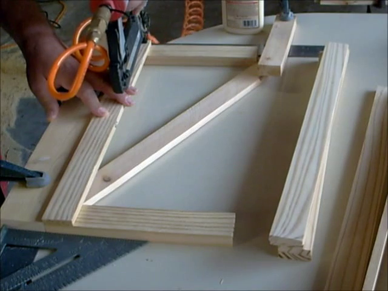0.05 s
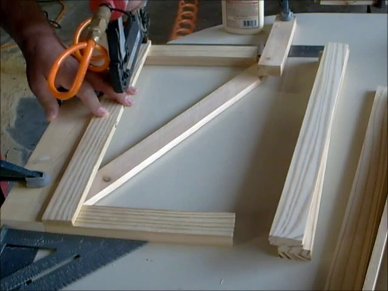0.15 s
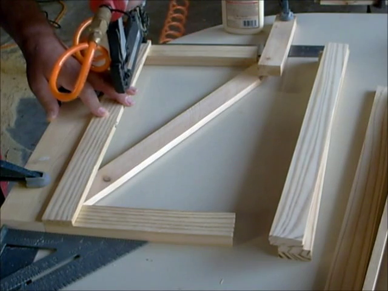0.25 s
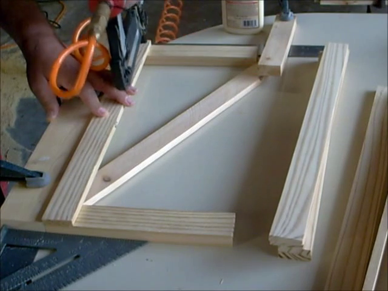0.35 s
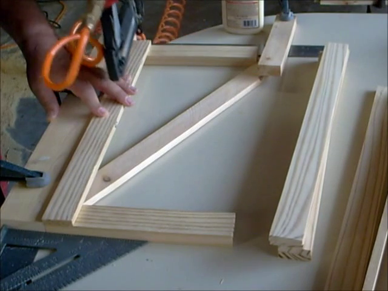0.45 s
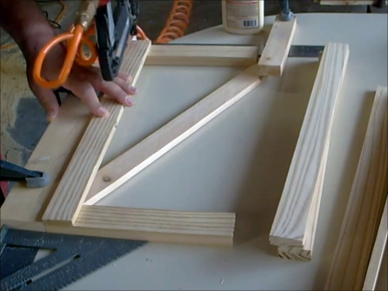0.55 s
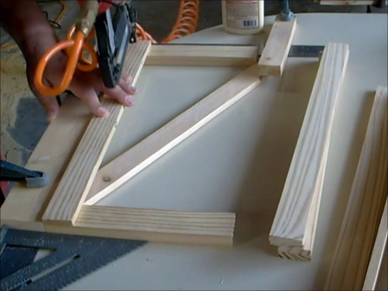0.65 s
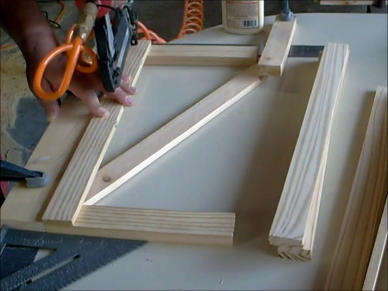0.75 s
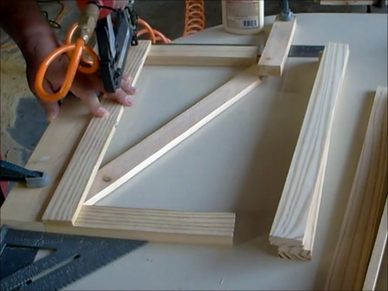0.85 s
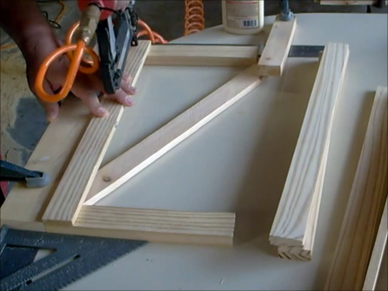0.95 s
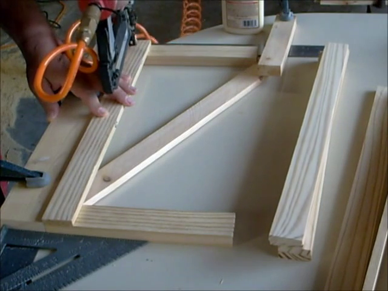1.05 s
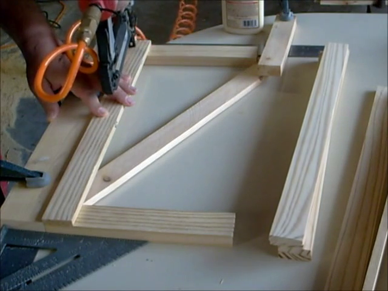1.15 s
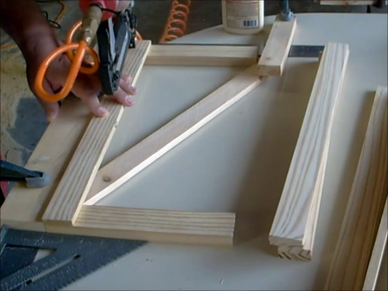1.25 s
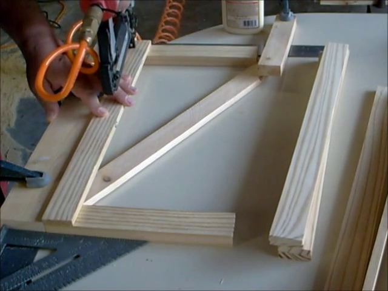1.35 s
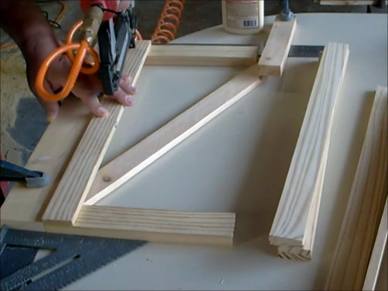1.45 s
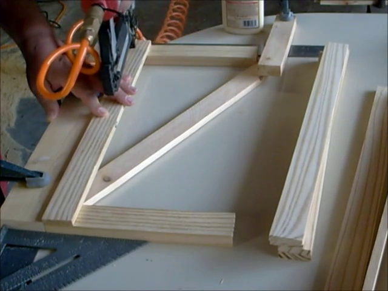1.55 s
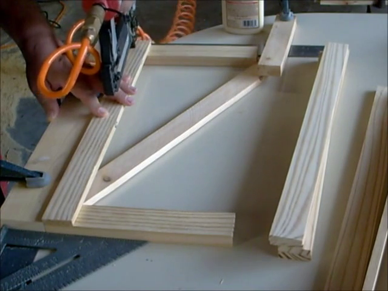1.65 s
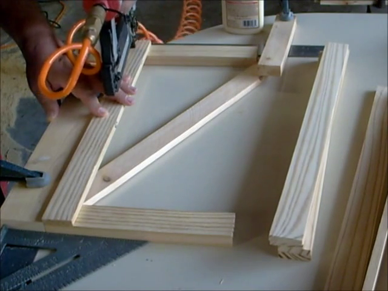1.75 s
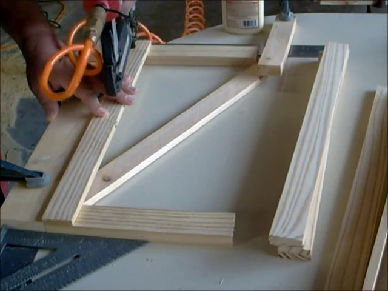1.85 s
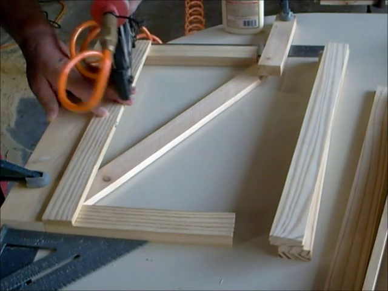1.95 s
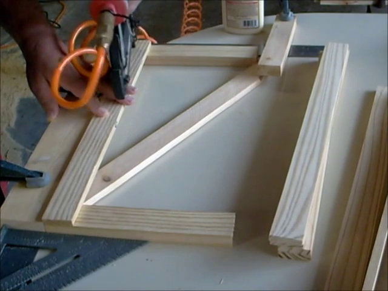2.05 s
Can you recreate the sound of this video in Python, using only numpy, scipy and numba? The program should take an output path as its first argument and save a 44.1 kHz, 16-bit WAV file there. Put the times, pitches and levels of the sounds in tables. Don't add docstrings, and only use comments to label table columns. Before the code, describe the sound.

A pneumatic nailer fires a single shot, close and harsh. Faint distant machine hum opens; around 0.21 seconds the trigger ticks and air hisses. At 0.24 the driver cracks into wood, and a piercing, distorted exhaust blast holds until about 0.36, with bright air at the piston's return. The room tail dies by about one second. Faint nose knocks follow near 1.2 and 1.4, and a dull tap at 2.05 over low hum.

```python
import sys
import numpy as np
from scipy import signal
from scipy.fft import rfft, irfft, next_fast_len
from scipy.io import wavfile
from scipy.ndimage import uniform_filter1d
from numba import njit

SR = 44100
rng = np.random.default_rng(int(sys.argv[2]) if len(sys.argv) > 2 else 0)


def voltage_ratio(level):
    return 10 ** (np.asarray(level, float) / 20)


def generate_wav(sig):
    pcm = np.round(np.clip(np.atleast_2d(sig).T, -1, 1) * 32767).astype(np.int16)
    wavfile.write(sys.argv[1], SR, pcm)


N = 92610

# frequency in Hz, level in dB.
HUM_COLOUR = [(30, -11), (250, -9.5), (450, -11), (800, -4), (1700, -10), (3500, -23.5), (4100, -28),
              (10600, -35.5)]
# time in seconds, level in dB.
HUM_SWELL = [(0, -59), (.2, -52), (1.0, -54.5), (1.5, -53.5), (2.1, -49.5)]
# start in seconds, level in dB, ring in seconds, pitch in Hz.
CONTACTS = [
    (.2090, -41.5, .004, 3000),
    (.2178, -42.5, .003, 3500),
    (.2226, -15, 0.0028, 3100),
    (.2295, -27.5, .002, 3100),
    (.2365, -29, .002, 3100),
    (1.2205, -57, .01, 2980),
    (1.234, -56, 0.028, 2500),
    (1.399, -54, .01, 1190),
    (2.05, -45, 0.011, 1000),
]
# frequency in Hz, level in dB.
VALVE_COLOUR = [(60, -22), (500, -20), (1000, -5), (1800, -16.5), (3000, -2.5), (5500, -2.5), (7500, -11.5),
                (10200, -8.5)]
# frequency in Hz, level in dB.
BLAST_COLOUR = [(60, -38), (300, -13.5), (1100, 2), (2300, -2), (3200, -0.5), (4900, -12), (7000, -24.5),
                (10600, -37)]
# frequency in Hz, time to fall 60 dB in seconds.
ROOM_T60 = [(100, .35), (300, 0.51), (1200, 0.59), (3100, 0.57), (4500, 0.6), (7000, 0.52), (10000, 0.42)]
# first trough in seconds, length in seconds,
# height in dB over full scale.
SURGES = [(.2447, .0016, 1.6), (.2475, .0003, .9), (.2484, .0011, -.4), (.2586, 0, -.3), (.2881, 0, .6),
          (.2983, .0006, -.8), (.3157, .0003, 1.0), (.3227, 0, 1.2), (.3343, .0003, 1.4), (.3586, 0, .8),
          (.3715, .0019, 1.7), (.3848, 0, .55), (.3918, .0003, .7), (.3996, .0003, .9), (.4014, 0, .55),
          (.4020, 0, .5), (.4193, 0, .5), (.4212, .0045, -2.5), (.4365, .0006, -1.2), (.4464, 0, .5),
          (.4565, .002, -2.5), (.4612, .003, -2.5), (.4940, 0, -.7)]

BLOW_S, BLAST_S, RETURN_S = .2432, .2555, .371
MIC_HZ = 3117


@njit
def follow(x, up, down):
    level, levels = 0., np.empty(len(x))
    for i in range(len(x)):
        level += (abs(x[i]) - level) * (up if abs(x[i]) > level else down)
        levels[i] = level
    return levels


def read_curve(rows, hz):
    rows = np.array(rows)
    return np.interp(np.log(np.maximum(hz, 1)), np.log(rows[:, 0]), rows[:, 1])


def unit(x):
    return x / np.sqrt(np.mean(x ** 2))


def coloured(rows):
    f = np.arange(N // 2 + 1) * SR / N
    spec = rfft(rng.standard_normal(N)) * voltage_ratio(read_curve(rows, f))
    return spec / np.sqrt(np.mean(irfft(spec, N) ** 2)), f


def band_share(f, hz, per_octave):
    return np.clip(1 - np.abs(per_octave * np.log2(np.maximum(f, 1) / hz)), 0, 1)


def walk(rate):
    k = max(int(SR / rate), 1)
    return unit(uniform_filter1d(uniform_filter1d(rng.standard_normal(N), k), k))


def ring(x, hz, width_hz):
    return signal.lfilter(*signal.iirpeak(hz, hz / width_hz, SR), x)


def fade(t, start, rise, t60):
    u = np.maximum(t - start, 0)
    return (1 - np.exp(-u / rise)) * voltage_ratio(-60 * u / t60)


def hum(t):
    spec, f = coloured(HUM_COLOUR)
    machines = 0
    for hz in 30 * 2 ** np.arange(0, 10.):
        machines = machines + irfft(spec * band_share(f, hz, 1), N) * voltage_ratio(walk(10))
    swell_db = np.interp(t, *np.array(HUM_SWELL).T)
    drone = ring(ring(machines, 780, 560), 783, 552)
    drone = drone * voltage_ratio(swell_db) * np.clip(t - 1, 0, 1) * 0.38
    return machines * voltage_ratio(-55.5 + 0.54 * (swell_db + 53.5)) + drone


def contacts(t):
    noise = rng.standard_normal(N)
    out = 0
    for start, db, ring_s, hz in CONTACTS:
        tap = unit(ring(ring(noise, hz, .8 * hz), hz, .9 * hz))
        out = out + voltage_ratio(db) * fade(t, start, .0008, 3 * ring_s) * tap
    return out


def piston_return(t):
    rise_s, t60, hz, level_db = .02, .03, 8500, -16.5
    u = t - RETURN_S
    swell = np.exp(np.minimum(u, 0) / rise_s) * (t > BLAST_S)
    shape = np.where(u < 0, swell, voltage_ratio(-60 * np.maximum(u, 0) / t60))
    air = unit(ring(ring(rng.standard_normal(N), hz, 5000), hz, 6000))
    return voltage_ratio(level_db) * shape * air


def valve(t):
    start_s, rise_s, sag_db_per_s, level_db = .2192, 0.002987, 450, -20
    shape = fade(t, start_s, rise_s, 60 / sag_db_per_s) * np.clip((BLAST_S - t) / .004, 0, 1)
    hiss = irfft(coloured(VALVE_COLOUR)[0], N)
    sputter_db = 1.2 * walk(500)
    return hiss * shape * voltage_ratio(level_db + sputter_db)


def blow(t):
    push_s, push_db, thud_hz, thud_db, thud_t60 = .0007, -3, 1050, -2, .02
    crack_db, crack_hold_s, crack_t60 = 6.5, .005, 0.0084
    u = (t - BLOW_S) / push_s
    push = -np.sin(np.pi * u) * (u > 0) * (u < 2) * voltage_ratio(push_db)
    push = push * np.where(u > 1, 3.0, 1)
    late = t - BLOW_S - 1.4 * push_s
    thud = voltage_ratio(thud_db) * np.sin(2 * np.pi * thud_hz * late) * fade(late, 0, .0003, thud_t60)
    shape = np.clip(late / 0.00035, 0, 1) * voltage_ratio(-60 * np.maximum(late - crack_hold_s, 0) / crack_t60)
    crack = shape * voltage_ratio(crack_db) * unit(ring(rng.standard_normal(N), MIC_HZ, 1200))
    return push + thud + crack


def blast(t):
    rise_s, hold_s, level_db, flutter_db, flutter_per_s = .003, .1, 6, 1, 120
    spec, f = coloured(BLAST_COLOUR)
    u = t - BLAST_S
    rise = 1 - np.exp(-np.maximum(u, 0) / rise_s)
    out = 0
    for hz in 60 * 2 ** np.arange(0, 8, .5):
        t60 = read_curve(ROOM_T60, hz)
        lift = voltage_ratio(60 * .29 * (1 / t60 - 1 / read_curve(ROOM_T60, MIC_HZ)))
        decay = voltage_ratio(-60 * np.maximum(u, hold_s) / t60)
        out = out + irfft(spec * band_share(f, hz, 2), N) * lift * rise * decay
    return out * voltage_ratio(level_db + flutter_db * walk(flutter_per_s))


def scene():
    t = np.arange(N) / SR
    return (contacts(t) + valve(t) + blow(t) + blast(t) + hum(t) + piston_return(t))[None]


def low_pass(x):
    return signal.sosfilt(signal.butter(12, 15800, fs=SR, output="sos"), x)


def record(dry):
    limit_db, attack_s, release_s, ratio = -10, 0.0025, 0.017, 5
    surge_edge_s, wrap_jump, top_hz, settle_s, out_db = .0008, 1.6, 10750, .12, 0.2
    t = np.arange(N) / SR
    peak = ring(dry[0], MIC_HZ, 690)
    x = dry[0] + voltage_ratio(10) * peak + voltage_ratio(9) * ring(peak, 1.015 * MIC_HZ, 220)
    level = follow(x, 1 / (attack_s * SR), 1 / (release_s * SR))
    x = x * np.minimum(voltage_ratio(limit_db) / (level + 1e-9), 1) ** (1 - 1 / ratio)
    peak = ring(x, MIC_HZ, 600)
    swing = peak / (np.abs(signal.hilbert(peak, next_fast_len(N))[:N]) + 1e-9)
    troughs = t[signal.argrelmin(swing)[0]]
    wrap = np.zeros(N)
    for first_s, length_s, db in SURGES:
        start = troughs[np.argmin(np.abs(troughs - first_s))] - 1.2e-4
        end = start + length_s + 2.6e-4
        weight = np.clip(1 - np.maximum(start - t, t - end) / surge_edge_s, 0, 1)
        surge = voltage_ratio(db) * swing
        x = x + weight * (surge - peak - 0.42 * (x - peak))
        wrap += (weight >= 1) * np.clip((-1 - surge) / 0.013, 0, 1)
    x = np.clip(x, -1, 1) + wrap_jump * wrap
    x = np.convolve(x, signal.firwin(161, top_hz, fs=SR, window=("kaiser", 7)), "same")
    x = signal.lfilter([1, -1], [1, -np.exp(-1 / (settle_s * SR))], x)
    x = np.clip(x * voltage_ratio(out_db), -1, 1)
    return low_pass(x[None])


dry = scene()
out = record(dry)
generate_wav(out)
```